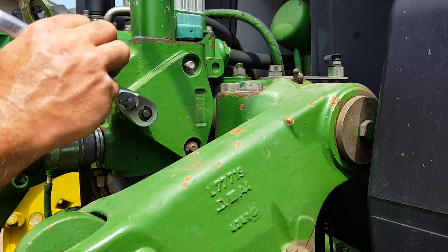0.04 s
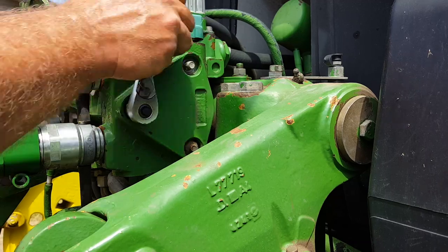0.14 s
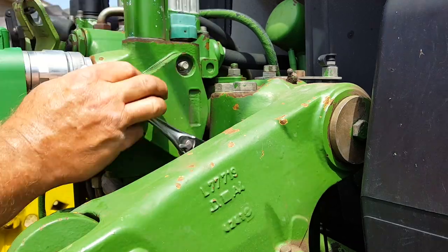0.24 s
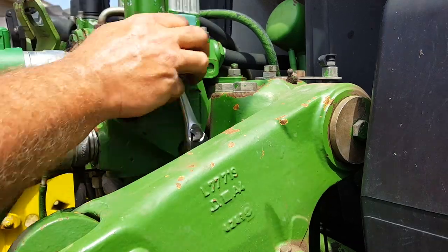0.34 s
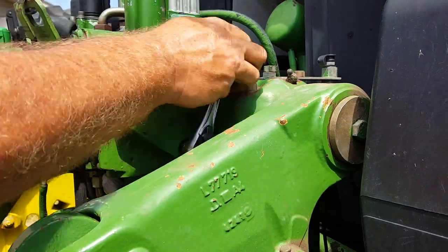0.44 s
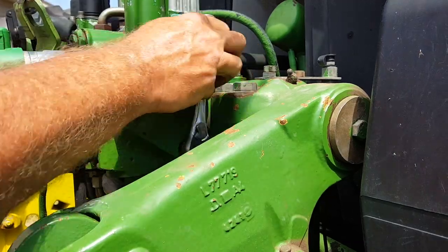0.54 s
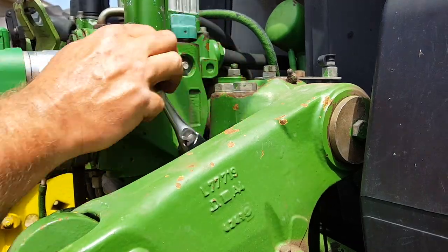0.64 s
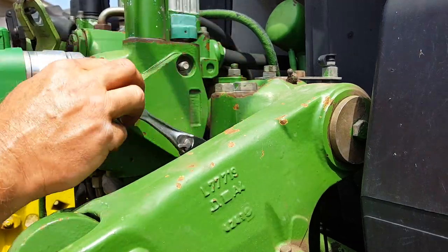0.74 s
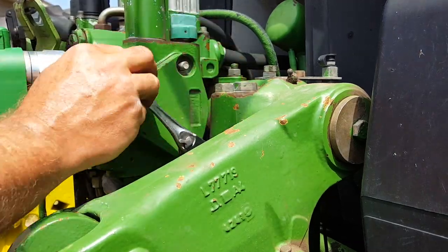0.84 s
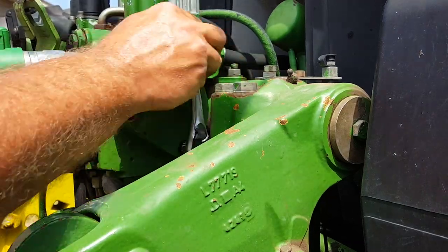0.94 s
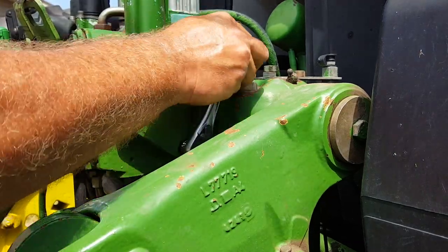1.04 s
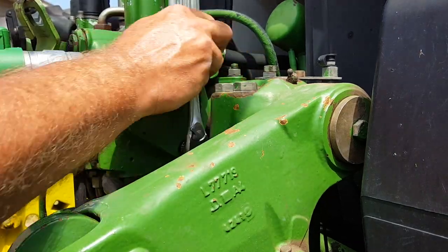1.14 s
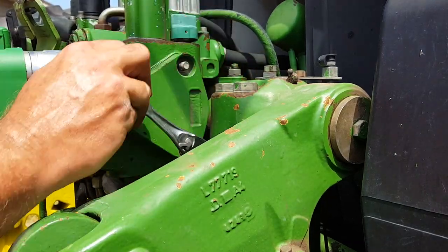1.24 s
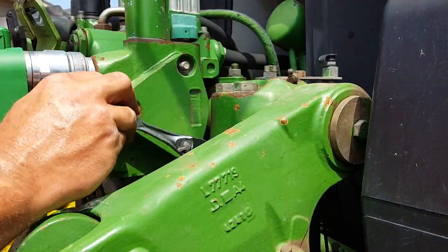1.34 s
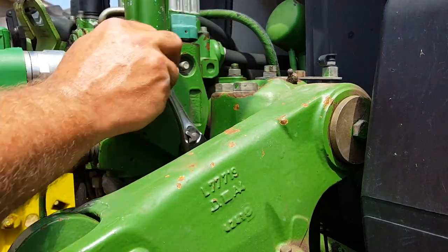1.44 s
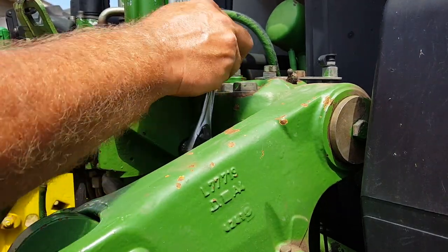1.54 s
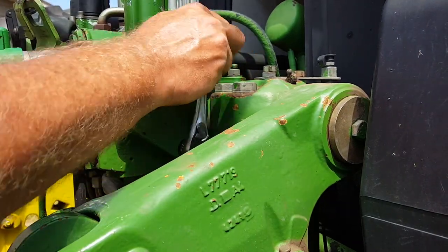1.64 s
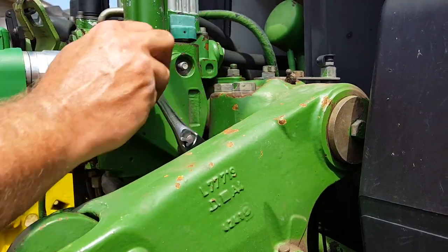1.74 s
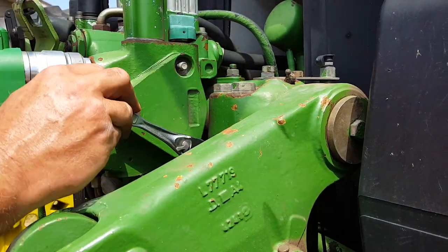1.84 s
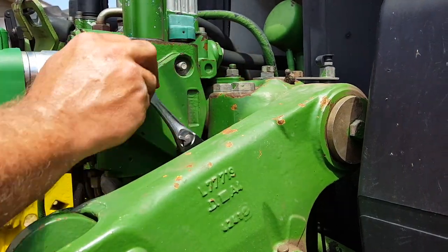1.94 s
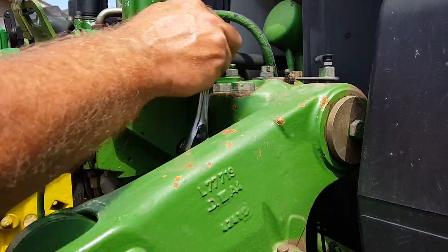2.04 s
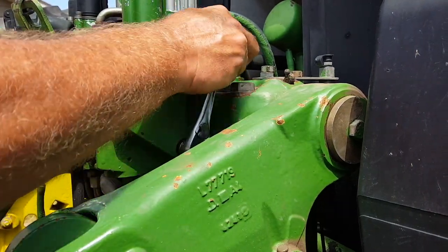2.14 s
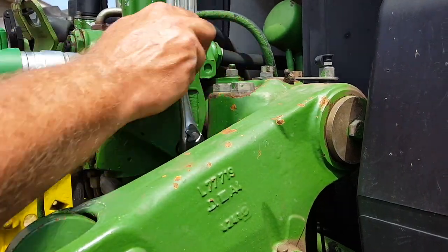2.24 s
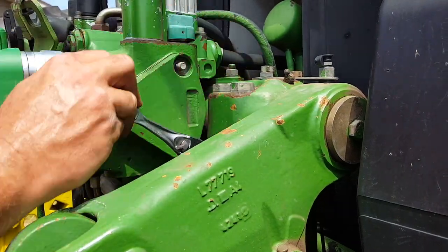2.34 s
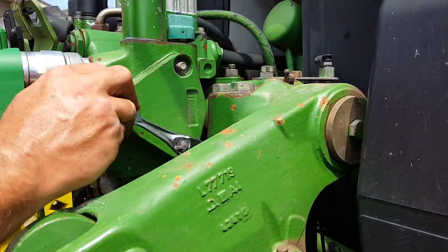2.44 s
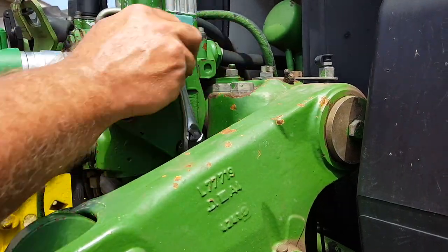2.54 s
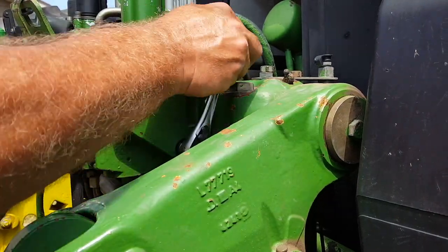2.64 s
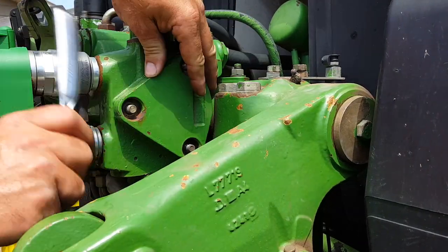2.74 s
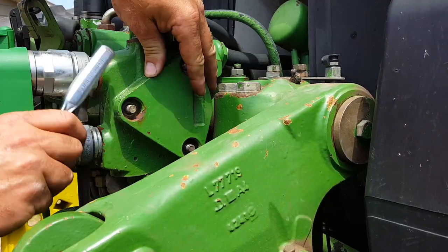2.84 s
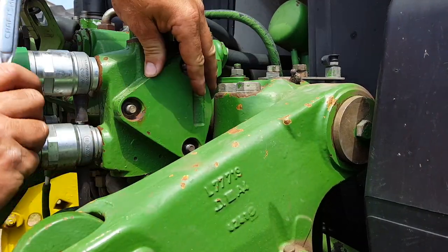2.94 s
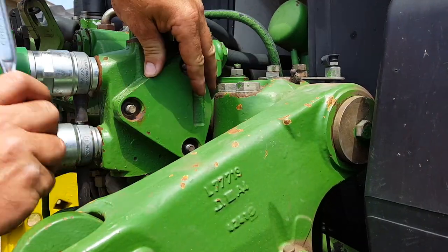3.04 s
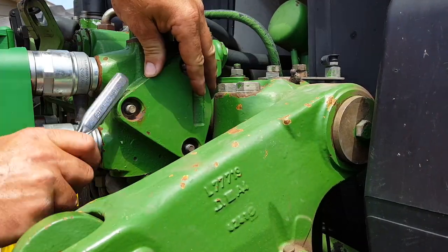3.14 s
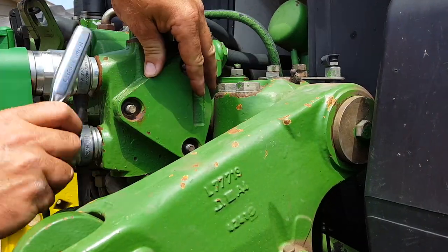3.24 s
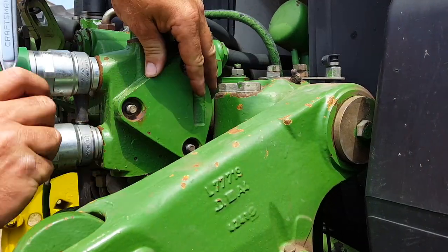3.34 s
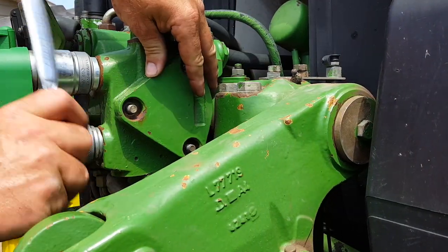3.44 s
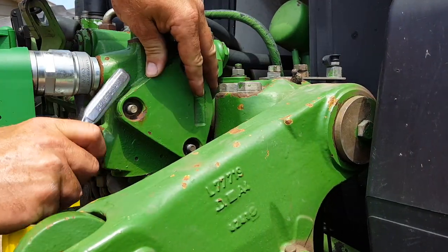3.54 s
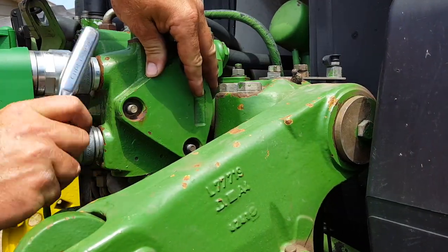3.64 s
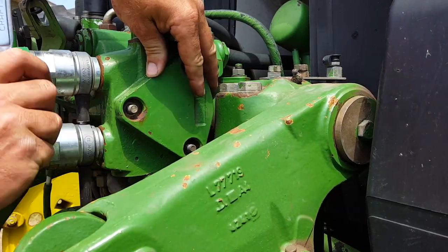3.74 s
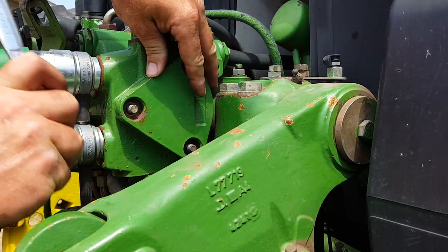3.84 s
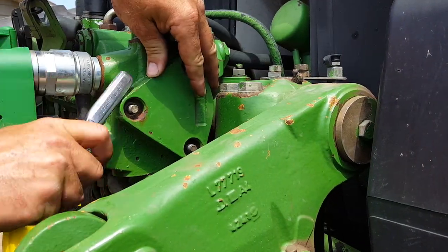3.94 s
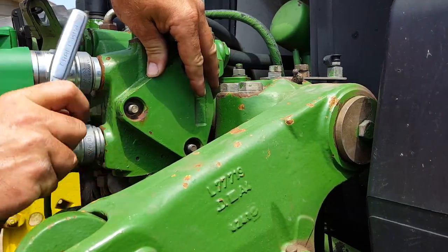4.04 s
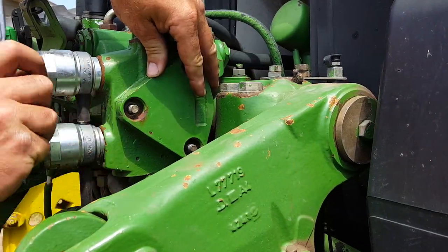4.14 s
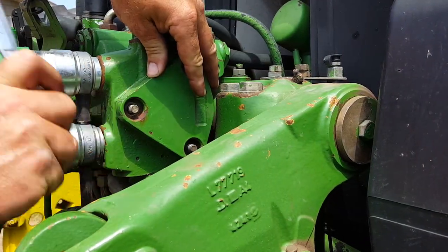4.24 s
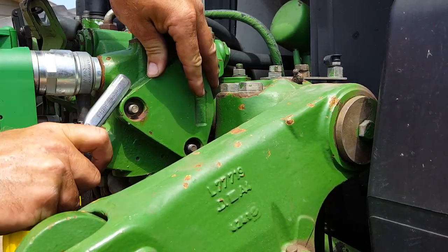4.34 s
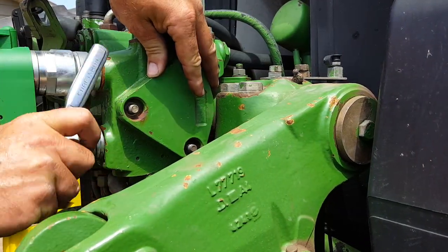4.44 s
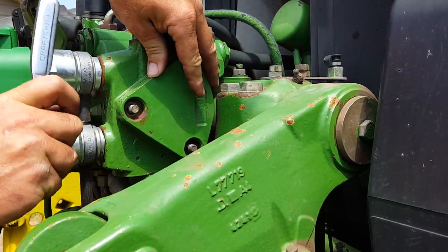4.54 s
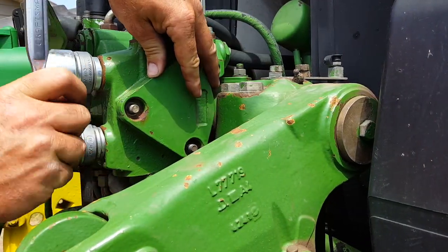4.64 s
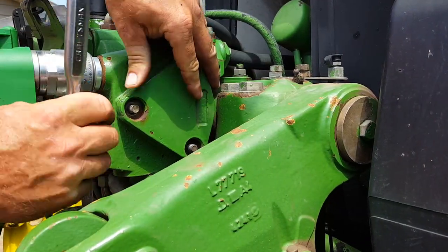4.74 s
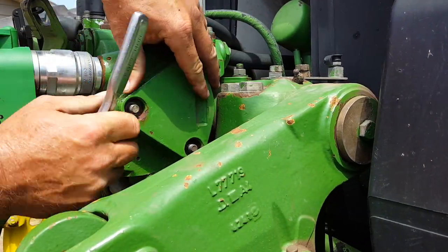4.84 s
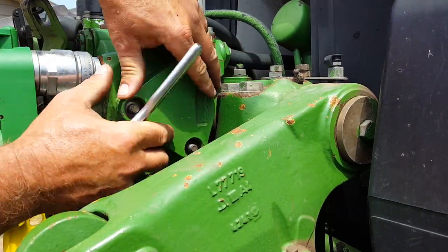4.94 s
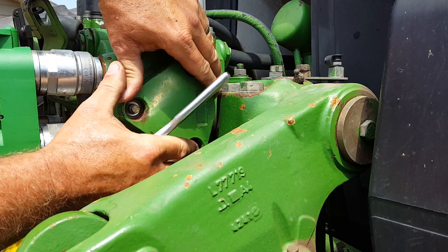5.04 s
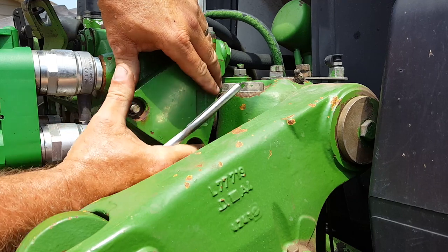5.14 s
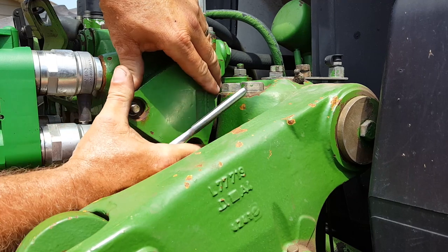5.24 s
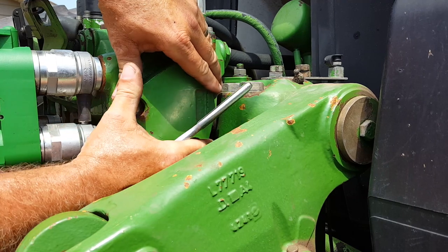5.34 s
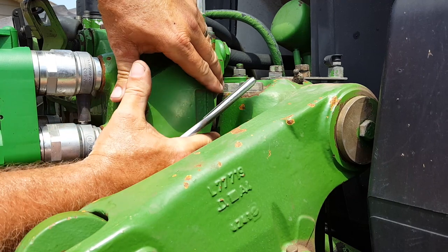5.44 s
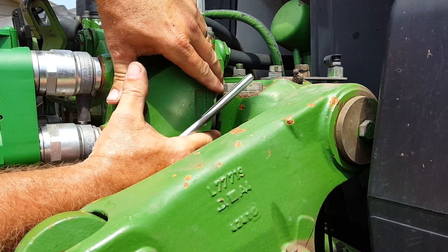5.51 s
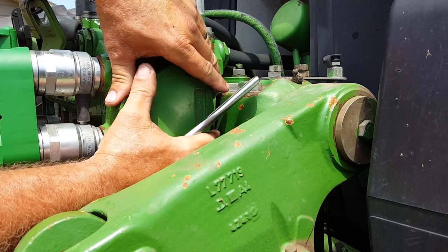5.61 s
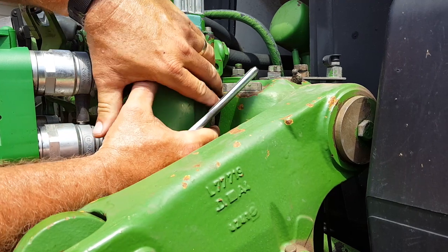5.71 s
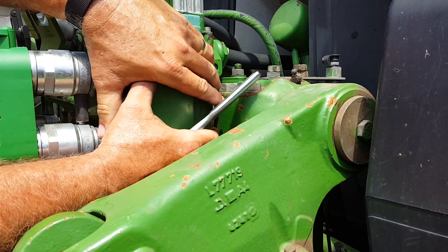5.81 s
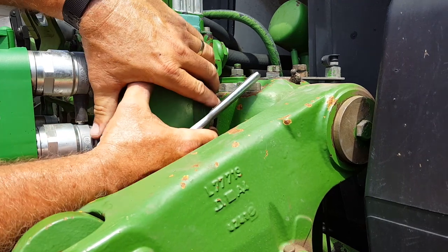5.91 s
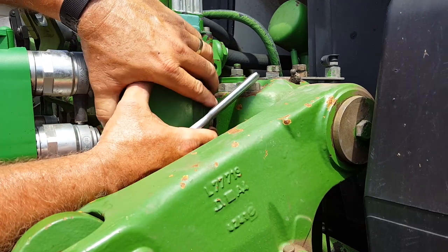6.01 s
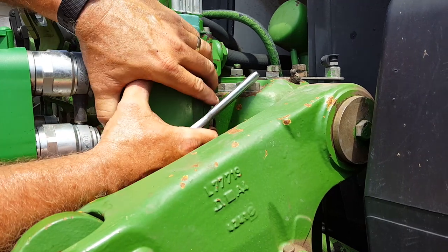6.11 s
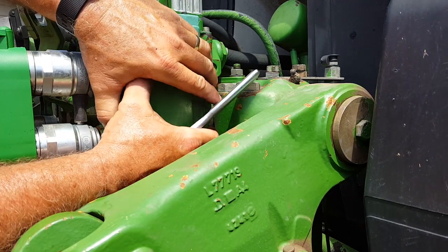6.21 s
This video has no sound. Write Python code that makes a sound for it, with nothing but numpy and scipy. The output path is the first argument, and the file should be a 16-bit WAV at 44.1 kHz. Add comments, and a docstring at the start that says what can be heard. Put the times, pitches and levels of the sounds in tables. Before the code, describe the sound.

A ratchet wrench works close by, outdoors, with almost no echo. From the start to about 2.7 seconds it backs out a bolt in six short runs of light clicks, with loose ticks, slight gritty rubbing and soft bumps between them. A faint puff of air touches the microphone at the very start. At about 2.8, 3.2, 3.5, 4.0 and 4.4 seconds, a steel socket strikes a tractor's cast iron cover. These five blows are by far the loudest sounds, each a sharp clank with an instant rebound, a brief ring and a dull thud beneath. From 4.8 seconds to the end at about 6.3, hands work the cover loose with small quiet ticks, soft bumps and a scuff near 5.7 seconds. A very faint rumble, hiss and distant trilling insect run throughout, with a few thin, far bird calls from 3.3 seconds.

```python
"""Faint rumble, hiss and a far insect throughout; a puff of air at the start.
To 2.7 s a ratchet wrench backs a bolt out of a tractor's cast valve cover: six return strokes of light
pawl clicks, with loose ticks between. From 2.8 s the socket is swung against the cover five times
to free it; it rebounds and rings on its drive after each blow. Far birds call from 3.3 s.
From 4.8 s hands work the cover loose: small ticks, soft bumps and a scuff."""
import sys
import numpy as np
from scipy import signal
from scipy.fft import rfft, irfft, next_fast_len
from scipy.io import wavfile

SR = 44100
rng = np.random.default_rng(int(sys.argv[2]) if len(sys.argv) > 2 else 0)


def pcm_store(signal):
    """Save signal as 16-bit PCM."""
    levels = np.round(np.clip(np.atleast_2d(signal), -1, 1) * 32767)
    wavfile.write(sys.argv[1], SR, levels.astype(np.int16).T)


N = 276507
TIME = np.arange(N) / SR
RING_TIME = np.arange(SR // 8) / SR

# single wrench clicks: (time [s], level [dB], body [dB])
SINGLE_CLICKS = [(0.05, -42, -13), (0.2017, -50, 6.5), (0.2616, -32.5, -1), (0.2658, -34.5, 1),
                 (0.3, -44.5, 3.5), (0.3979, -34.5, 3.5), (0.4836, -31, -2), (.598, -56.5, 11),
                 (0.6355, -50.5, -1.5), (.9035, -57.5, 11.5), (1.176, -51.5, 5), (1.1852, -50.5, 6),
                 (1.2044, -50.5, 13.5), (1.414, -40.5, -2.5), (1.738, -42.5, -2.5), (1.9511, -45, 5.5),
                 (1.979, -62.5, 15), (2.213, -53.5, 15.5), (2.2572, -49, 2), (2.5, -37, 2.5),
                 (2.6433, -26.5, -13.5), (2.6542, -38.5, 7), (2.678, -43, 6.5)]
# wrench contact noise: (frequency [Hz], density [dB])
PAWL_SPECTRUM = [(300, -23.5), (550, -9.5), (800, 0.5), (1300, -7.5), (1900, -1.5), (2500, -2.5),
                 (4400, -1), (6000, 0), (7300, -4), (9300, -2.5), (11200, 1), (12900, -0.5), (14500, -5),
                 (16000, -15.5)]
# return strokes: (first tooth [s], first gap [s], gap over previous gap, teeth, last click [s])
RETURN_STROKES = [(.1049, .0176, .953, 4, .1865), (.3718, .0267, .909, 6, .512),
                  (.9648, .0224, 1.034, 5, 1.092), (1.5039, .018, 1.097, 6, 1.6602),
                  (2.0395, .0186, 1.044, 6, 2.177), (2.5825, .0161, 1.08, 6, 2.7113)]
# hand force per stroke: (start level [dB], mid level [dB], end level [dB], firmness [dB], drag [dB])
STROKE_FORCES = [(-33.5, -32, -34, -10, -56.5), (-34.5, -33.5, -31, -2, -59.5), (-39, -29, -36, 2.5, -57.5),
                 (-39.5, -37, -33.5, 2, -62), (-41.5, -31, -43, 4, -52.5), (-42.5, -36, -42, 0, -60.5)]
# socket on cover: (time [s], level [dB], clank [dB], knock [dB], rebound delay [s], rebound [dB],
# thud [dB], thud left over right [dB], thud upper edge [Hz])
SOCKET_BLOWS = [(2.838, -8, -0.5, 3, .02, -7, -22, 11, 219),
                (3.1667, -9.5, .5, -6, 0.016, -6.5, -13, 10, 419),
                (3.5472, -8, -8.5, 6, .016, -6, -19, 17, 450),
                (3.9607, -8.5, .5, 1, .016, -6.5, -16, 26.5, 430),
                (4.359, -7.5, 1, 7, .015, -7.5, -16, 4.5, 219.7)]


def from_db(db):
    """Decibels to gain."""
    return 10 ** (np.asarray(db) / 20)


def rms_one(x):
    """Scale to rms 1."""
    return x / np.sqrt(np.mean(x ** 2) + 1e-20)


def in_time(curve):
    """A (time, value) curve at every sample."""
    return np.interp(TIME, *np.transpose(curve))


def panned(db):
    """Stereo gains, left over right by db."""
    return from_db(np.array([db, -db]) / 2).reshape(2, -1)


def add(out, at_s, sound):
    """Mix a stereo sound in."""
    at = round(at_s * SR)
    out[:, at:at + sound.shape[1]] += sound[:, :N - at]


def dying(t60_s, t=RING_TIME):
    """Exponential decay, 60 dB down at t60_s."""
    return from_db(-60 * t / t60_s)


def swell(at_s, width_s):
    """Gaussian rise and fall, height 1."""
    return np.exp(-np.minimum(((TIME - at_s) / width_s) ** 2, 20))


def drift(rate_hz):
    """Random curve through unit-variance knots."""
    knots = rng.standard_normal(int(N / SR * rate_hz) + 2)
    return np.interp(TIME * rate_hz, np.arange(len(knots)), knots)


def low_pass(x, hz, order=2):
    """Butterworth low-pass."""
    return signal.sosfilt(signal.butter(order, min(hz, SR / 2.2), fs=SR, output="sos"), x)


def band_gain(x, low_hz, high_hz, db):
    """Raise or lower one band."""
    band = signal.sosfilt(signal.butter(1, [low_hz, high_hz], "band", fs=SR, output="sos"), x)
    return x + (from_db(db) - 1) * band


def noise(spectrum, size, alike=0.):
    """Stereo noise, rms 1, from (frequency [Hz], density [dB]) rows; alike: left-right correlation."""
    hz, db = np.transpose(spectrum)
    padded = next_fast_len(size)
    bins_hz = np.maximum(np.fft.rfftfreq(padded, 1 / SR), 1)
    gain = from_db(np.interp(np.log(bins_hz), np.log(hz), db))
    mid, side = irfft(rfft(rng.standard_normal((2, padded))) * gain, padded)[:, :size]
    return rms_one(np.sqrt(1 + alike) * mid + np.sqrt(1 - alike) * np.array([side, -side]))


def ring(modes, t60_s, damping, scatter_db, detune, build_s):
    """Struck (frequency [Hz], level [dB]) modes, detuned by the grip, in random phase per channel."""
    hz, db = np.transpose(modes)[:, :, None]
    hz = hz * (1 + detune * rng.standard_normal(hz.shape))
    decay = dying(t60_s * (hz / hz.mean()) ** -damping)  # high modes die first
    strength = from_db(db + scatter_db * rng.standard_normal(hz.shape))
    swing = strength * decay * np.exp(2j * np.pi * hz * RING_TIME)
    phases = np.exp(2j * np.pi * rng.random((2, len(modes))))
    return (phases @ swing).imag * (1 - np.exp(-RING_TIME / build_s)) / np.sqrt(len(modes))


def chatter(t60_s, gap_s, bounce_db):
    """Envelope of a contact that bounces three times, weaker each time."""
    power = dying(t60_s) ** 2
    for k, delay_s in enumerate(gap_s * np.cumsum(rng.uniform(.78, .83, 3)), 1):
        bounce = from_db(bounce_db * k) * dying(t60_s, np.abs(RING_TIME - delay_s))
        power += (RING_TIME > delay_s) * bounce ** 2
    return np.sqrt(power)


def glides(table, width_hz):
    """Narrow noise bands that swell, slide in pitch and fade."""
    out = np.zeros((2, N))
    for start_s, end_s, from_hz, to_hz, db in table:
        size = round((end_s - start_s) * SR)
        phase = 2 * np.pi * np.cumsum(np.geomspace(from_hz, to_hz, size)) / SR
        grain = rms_one(low_pass(rng.standard_normal((2, size)), width_hz))
        add(out, start_s, from_db(db) * np.hanning(size) * grain * np.sin(phase))
    return out


def rumble():
    """Lumpy rumble; swells as the arm turns round after each stroke."""
    # rumble colour: (frequency [Hz], density [dB])
    spectrum = [(12, -38.5), (20, -9), (27, -14.5), (43, -4), (91, 3.5), (247, -10), (300, -8), (468, -24),
                (505, -25.5), (700, -21.5), (910, -48), (1540, -120)]
    # base level: (time [s], level [dB])
    levels = [(0, -62), (2.7, -59), (2.95, -71), (4.95, -73.5), (5.25, -61), (6.27, -60)]
    arm = sum(swell(stop_s + .066, width_s=.22) for *_, stop_s in RETURN_STROKES)
    level_db = in_time(levels) + 4 * arm + 1.2 * drift(12)
    return from_db(level_db) * panned(-1.1) * noise(spectrum, N, alike=.61)


def early_hiss(end_s):
    """A hiss that lasts until end_s."""
    # hiss colour: (frequency [Hz], density [dB])
    spectrum = [(240, -29.5), (400, -1.5), (439, -3), (666, -4.5), (777, -3.5), (1440, -15.5),
                (4180, -11.5), (4730, -6.5), (5270, -12), (8630, -18.5), (9610, -32), (12100, -24.5),
                (16000, -30)]
    # base level: (time [s], level [dB])
    levels = [(0, -66.5), (.3, -66.5), (1.8, -65), (2.77, -64.5)]
    return (TIME < end_s) * from_db(in_time(levels) + 1.3 * drift(4)) * noise(spectrum, N, alike=.033)


def insect(rate_hz):
    """A far insect trills in short high pulses."""
    pulses = np.abs(np.sin(np.pi * (rate_hz * TIME + .05 * drift(3)))) ** 3
    return pulses * noise([(8000, -60.5), (8450, -3), (8720, -3), (9100, -60)], N, alike=.24)


def ambience():
    """Hiss and insect throughout; a palm scuffing the cover lifts the hiss once."""
    # hiss colour: (frequency [Hz], density [dB])
    spectrum = [(250, -24), (400, -0.5), (520, -4), (700, -5), (1200, -8), (2900, -11), (4500, -16.5),
                (6500, -18.5), (8300, -13.5), (9600, -21), (12000, -16.5), (14200, -13.5), (16000, -15)]
    # gain of hiss and insect: (time [s], gain [dB])
    gains = [(2.78, -73.5), (4.2, -79), (4.95, -77.5), (5.3, -68), (6.27, -67)]
    scuff_db = 7.5 * swell(at_s=5.74, width_s=.045)
    hiss = from_db(scuff_db) * noise(spectrum, N, alike=.1)
    return from_db(in_time(gains)) * (hiss + from_db(-8) * insect(rate_hz=17.1))


def puff(level_db, pan_db):
    """A brief puff of air flutters on the microphones."""
    spectrum = [(18, -26), (45, -10), (100, 3), (180, -9.5), (300, -19), (900, -58)]
    gust = np.interp(TIME, [.28, .31], [1, 0])
    return from_db(level_db) * gust * panned(pan_db) * noise(spectrum, N, alike=.38)


def click(body_db, ring_db):
    """One contact in the wrench: bouncing crack, clatter in the head, ring of wrench and spring."""
    # wrench modes: (frequency [Hz], level [dB])
    wrench_modes = [(883, -14.5), (1050, -12.5), (1780, -4), (1925, -3.5), (2080, -8.5), (2280, -9.5),
                    (2950, -5.5), (3200, -9), (3850, -9.5), (4110, 2), (4450, -7.5), (4750, -10),
                    (5400, -8), (6170, 0.5), (6550, -9), (8170, -1), (8570, -14), (10950, -2.5), (11200, 2),
                    (11380, -1.5), (12800, -3.5), (13700, -9.5)]
    # pawl and spring modes: (frequency [Hz], level [dB])
    spring_modes = [(4450, -11.5), (4800, -9.5), (12700, -3.5), (12950, -0.5), (13800, -5.5)]
    crack = chatter(t60_s=.0064, gap_s=.002, bounce_db=-3.5)
    clatter = from_db(ring_db - 10) * dying(.061)
    contact = (crack + clatter) * noise(PAWL_SPECTRUM, len(RING_TIME), alike=.048)
    wrench = ring(wrench_modes, t60_s=.046, damping=.13, scatter_db=3.3, detune=.006, build_s=.00027)
    spring = ring(spring_modes, t60_s=.0082, damping=.089, scatter_db=5.5, detune=.0062, build_s=.0003)
    out = contact + from_db(ring_db + 7) * wrench
    out += (from_db(body_db) - 1) * low_pass(out, 5700, order=1)  # firm clicks shake the whole handle
    return out + from_db(-1) * spring


def single_clicks():
    """Single wrench clicks: the socket shifts in its slack on the bolt, between strokes and within them."""
    out = np.zeros((2, N))
    for at_s, level_db, body_db in SINGLE_CLICKS:
        add(out, at_s, from_db(level_db) * click(body_db, ring_db=-6.5))
    return out


def drag(rough_db, scrape_s=.027, lead_s=.0134, lag_s=.025):
    """Gritty rubbing of socket and pawl with each single click and each stroke."""
    level = np.zeros(N)
    for at_s, level_db, body_db in SINGLE_CLICKS:
        level += from_db(level_db + body_db - 25.5) * swell(at_s + scrape_s / 2, scrape_s)
    for (start_s, *_, stop_s), (*_, drag_db) in zip(RETURN_STROKES, STROKE_FORCES):
        along = np.interp(TIME, [start_s - lead_s, stop_s + lag_s], [0, 1])
        level += from_db(drag_db) * np.sqrt(np.abs(np.sin(np.pi * along)))
    rub = band_gain(noise(PAWL_SPECTRUM, N), 900, 6800, db=7)
    rub = band_gain(rub, 800, 1700, db=5)
    grit = rub * from_db(rough_db * drift(700))
    return level * rms_one(grit)


def thump(edge_hz, lowest_hz, order):
    """One dull, low thump, peak 1."""
    pulse = low_pass(signal.unit_impulse(len(RING_TIME)), edge_hz, order)
    pulse = signal.sosfilt(signal.butter(2, lowest_hz, "high", fs=SR, output="sos"), pulse)
    return pulse / np.abs(pulse).max()


def bumps():
    """Soft bumps of hand and arm."""
    # bumps: (time [s], left peak [dB], right peak [dB], upper edge [Hz])
    touches = [(0.086, -54, -31, 116), (0.111, -63, -33, 101), (0.215, -55, -28.5, 158),
               (0.271, -52, -31, 145), (1.744, -39, -38, 238), (2.275, -42, -42, 260),
               (5.24, -59, -43, 98.4), (5.444, -55, -41, 150), (6.235, -48, -47, 169.3)]
    out = np.zeros((2, N))
    for at_s, left_db, right_db, edge_hz in touches:
        add(out, at_s, from_db([[left_db], [right_db]]) * thump(edge_hz, lowest_hz=55, order=5))
    return out


def ratchet(scatter_db):
    """The pawl drops off tooth after tooth as the handle speeds or slows, and once more as it stops."""
    out = np.zeros((2, N))
    for stroke, (*levels_db, firm_db, _) in zip(RETURN_STROKES, STROKE_FORCES):
        start_s, gap_s, gap_ratio, teeth, stop_s = stroke
        gaps_s = gap_s * gap_ratio ** np.arange(teeth - 1)
        times_s = np.r_[start_s, start_s + np.cumsum(gaps_s), stop_s]
        for at_s, along in zip(times_s, np.linspace(0, 1, len(times_s))):
            level_db = np.interp(along, [0, .5, 1], levels_db) + scatter_db * rng.standard_normal()
            # clicks grow fuller and ring more along a stroke
            body_db = firm_db + np.interp(along, [0, 1], [-12.5, 0])
            ring_db = firm_db / 2 + np.interp(along, [0, 1], [-15.5, -3])
            tooth = from_db(level_db) * click(body_db, ring_db)
            add(out, at_s, tooth)
            add(out, at_s + rng.uniform(.008, .014), from_db(-15.5) * tooth)  # pawl seats in next tooth
    return out


def rubs():
    """A hollow rub falls in pitch as the wrench swings back."""
    # rubs: (start [s], end [s], from [Hz], to [Hz], level [dB])
    swings = [(1.176, 1.296, 780, 392, -56.5), (1.701, 1.788, 857, 290, -56.5),
              (2.17, 2.349, 801, 220.5, -56.5), (2.621, 2.707, 1001, 667, -53)]
    return glides(swings, width_hz=110)


def strike(clank_db, knock_db):
    """Steel on cast iron: crack, duller clatter, hand-damped modes; the spot struck sets the colour."""
    # impact noise: (frequency [Hz], density [dB])
    spectrum = [(200, -11.5), (600, -7.5), (1200, -4), (1850, 0.5), (2250, -2), (3800, -2), (5100, -5.5),
                (6300, 2.5), (7300, -8.5), (8250, -0.5), (9700, -8.5), (11300, -3), (13200, -4.5),
                (16000, -14.5)]
    # joint modes of socket and cover: (frequency [Hz], level [dB])
    cover_modes = [(1430, -15.5), (1574, -9.5), (1872, -3.5), (1950, -5.5), (2080, -10), (2332, -9.5),
                   (2598, -5), (2760, -7), (3162, -8.5), (3420, -9.5), (3774, -3), (3900, -8), (4072, 0),
                   (4250, -8), (4936, -8.5), (5670, -9.5), (6110, -1.5), (6250, -0.5), (6473, -4),
                   (6720, -9.5), (7670, -11), (7864, -8.5), (8170, 5.5), (8320, -5.5), (8600, -8.5),
                   (10950, -5.5), (11250, 3), (11550, -6.5), (13000, -6), (13220, -5.5)]
    crack = chatter(t60_s=.018, gap_s=.0052, bounce_db=-7) * noise(spectrum, len(RING_TIME), alike=-.037)
    clatter = from_db(-12) * dying(.1) * noise(spectrum, len(RING_TIME), alike=-.029)
    cover = ring(cover_modes, t60_s=.072, damping=.1, scatter_db=2.5, detune=.0032, build_s=.0006)
    hit = crack + low_pass(clatter, 9000, order=1) + from_db(-2) * cover
    hit = band_gain(hit, 1400, 2200, clank_db)
    return band_gain(hit, 480, 950, knock_db)


def blows(socket_db):
    """Each blow has a lighter rebound, which leaves the socket ringing on its drive."""
    # loose socket modes: (frequency [Hz], level [dB])
    socket_modes = [(1872, -2), (1925, -2.5), (4072, -6.5), (6131, -4), (8168, -8)]
    out = np.zeros((2, N))
    for at_s, level_db, clank_db, knock_db, rebound_s, rebound_db, *_ in SOCKET_BLOWS:
        add(out, at_s, from_db(level_db) * panned(2.5) * strike(clank_db, knock_db))
        socket = ring(socket_modes, t60_s=.08, damping=.05, scatter_db=2, detune=.002, build_s=.0006)
        rebound = strike(clank_db + 1, knock_db=-6.5) + from_db(socket_db) * socket
        add(out, at_s + rebound_s, from_db(level_db + rebound_db) * panned(-.7) * rebound)
    return out


def thuds(lag_s):
    """The dull thud under each blow."""
    out = np.zeros((2, N))
    for at_s, *_, thud_db, pan_db, edge_hz in SOCKET_BLOWS:
        add(out, at_s + lag_s, from_db(thud_db) * panned(pan_db) * thump(edge_hz, lowest_hz=63.4, order=2))
    return out


def chassis(boom_db, hum_db, hum_hz):
    """The tractor's heavy body booms and hums on faintly after each blow."""
    spectrum = [(30, -22.5), (90, -1.5), (200, -4), (400, -16.5), (1500, -39.5), (8000, -47)]
    out = np.zeros((2, N))
    t = TIME[:SR]
    hum = np.sin(2 * np.pi * hum_hz * t) * dying(2.9, t)
    for at_s, *_ in SOCKET_BLOWS:
        boom = noise(spectrum, SR, alike=.33) * dying(.37, t)
        add(out, at_s, from_db(boom_db) * boom + from_db(hum_db) * hum)
    return out


def birds():
    """Far birds: short, thin, gliding calls."""
    # calls: (start [s], end [s], from [Hz], to [Hz], level [dB])
    calls = [(3.31, 3.39, 3590, 3530, -78), (3.46, 3.51, 3560, 3660, -77), (4.83, 4.92, 2200, 2496, -76.5),
             (4.96, 5.17, 7150, 6850, -79), (5.78, 5.99, 7200, 7540, -78)]
    return glides(calls, width_hz=77)


def cover_ticks(clink_db):
    """The cover ticks against its seat: one broad resonance and a brief clink each time."""
    # contacts: (time [s], level [dB], centre [Hz], t60 [s])
    contacts = [(4.80, -66.5, 4190, 0.045), (5.004, -59.5, 3700, 0.053), (5.224, -56.5, 3960, 0.049),
                (5.739, -46.5, 885, 0.073), (5.944, -60, 3390, 0.023), (6.075, -41.5, 12460, 0.023),
                (6.076, -45, 1570, 0.024)]
    out = np.zeros((2, N))
    for at_s, level_db, hz, t60_s in contacts:
        spectrum = [(hz / 8, -22), (hz / 2, -6), (hz, 0), (hz * 2, -9), (hz * 8, -26)]
        clink = ring([(hz, 0), (hz * 1.13, -3)], t60_s, damping=0, scatter_db=1, detune=.01, build_s=.0005)
        tick = noise(spectrum, len(RING_TIME)) * dying(t60_s)
        add(out, at_s, from_db(level_db) * (tick + from_db(clink_db) * clink))
    return out


def with_reflections(x, wet_db, t60_s):
    """Add faint, dull reflections from the machine and the yard."""
    t = TIME[:SR // 2]
    echo = noise([(100, -1), (1000, -1), (6000, -2.5), (15000, -7.5)], len(t))
    echo *= dying(t60_s, t) * (1 - dying(.067, t))
    echo /= np.sqrt(np.sum(echo ** 2) / 2)
    return x + from_db(wet_db) * signal.fftconvolve(x, echo, axes=1)[:, :N]


def scene():
    """Wrench, blows and hands close by, over a faint background."""
    wrench = (ratchet(scatter_db=.8) + single_clicks() + drag(rough_db=4.5)) * panned(.6)
    metal = wrench + blows(socket_db=-10.5) + cover_ticks(clink_db=-3.5)
    metal = with_reflections(metal, wet_db=-51.5, t60_s=.65)
    lows = bumps() + thuds(lag_s=.00089) + chassis(boom_db=-44, hum_db=-65, hum_hz=91.5)
    close = metal + lows + rubs() + puff(level_db=-52.5, pan_db=-10)
    return close + rumble() + early_hiss(end_s=2.795) + ambience() + birds()


def record(dry):
    """Round the highest peaks; cut above 15.7 kHz."""
    rounded = .95 * np.tanh(dry / .95)
    return signal.sosfilt(signal.ellip(10, .2, 80, 15700, fs=SR, output="sos"), rounded)


dry = scene()
out = record(dry)
pcm_store(out)
```